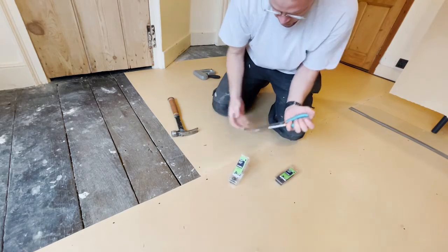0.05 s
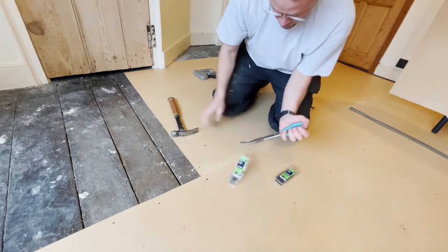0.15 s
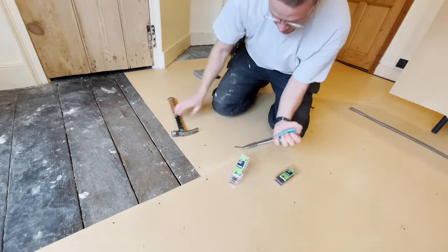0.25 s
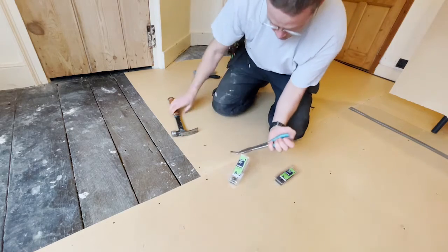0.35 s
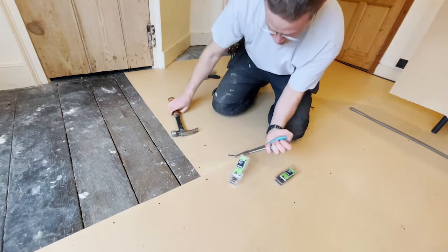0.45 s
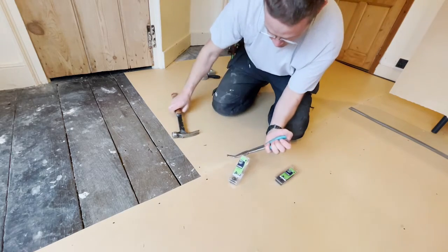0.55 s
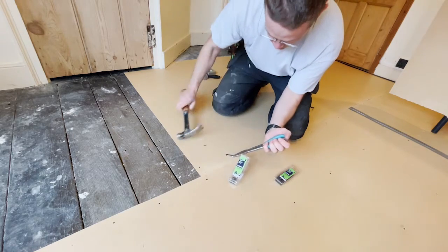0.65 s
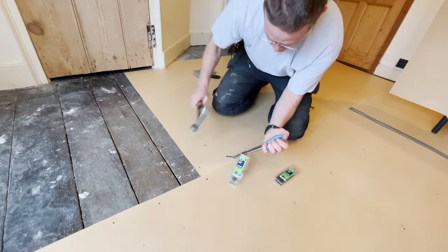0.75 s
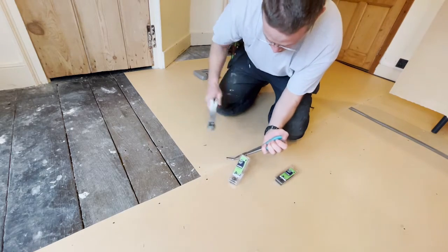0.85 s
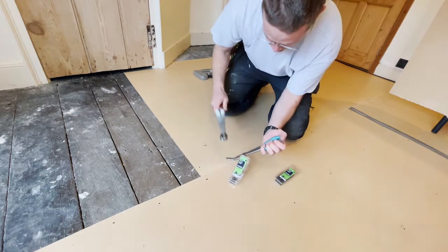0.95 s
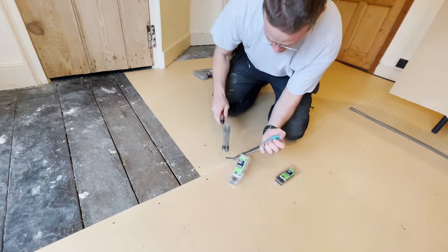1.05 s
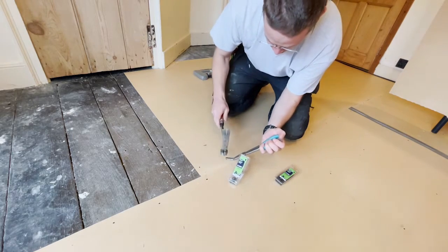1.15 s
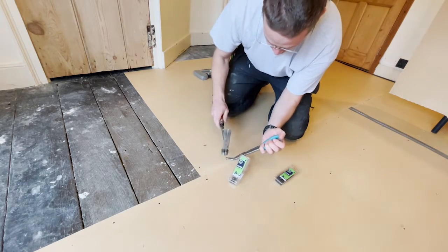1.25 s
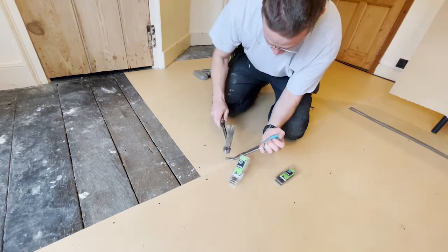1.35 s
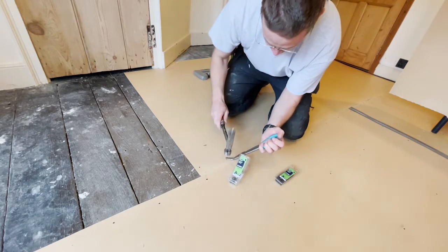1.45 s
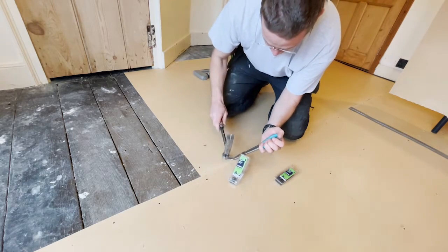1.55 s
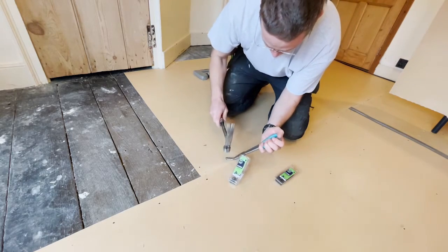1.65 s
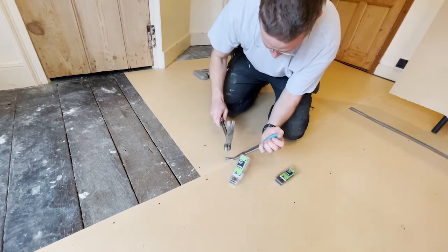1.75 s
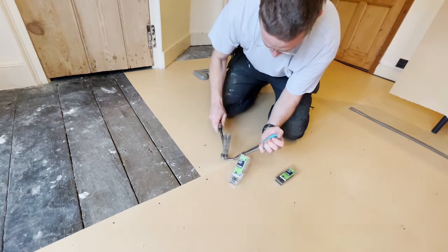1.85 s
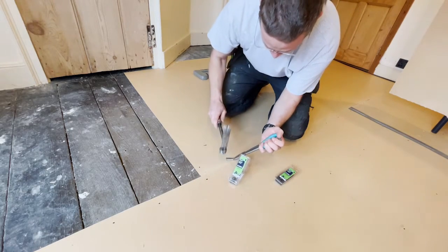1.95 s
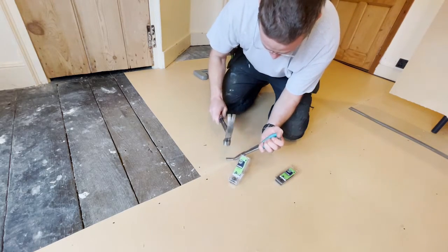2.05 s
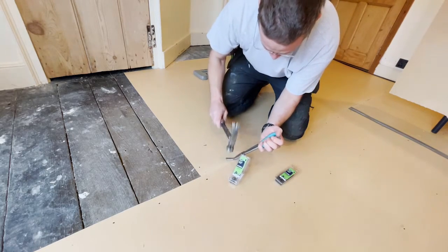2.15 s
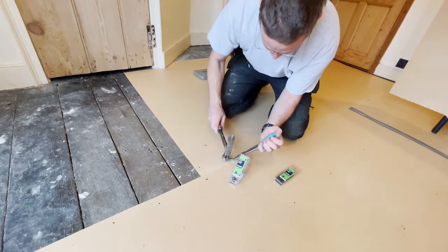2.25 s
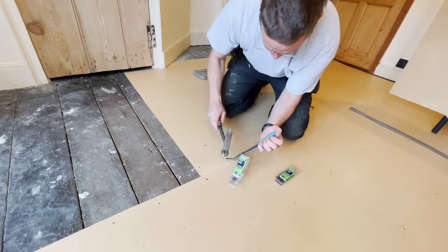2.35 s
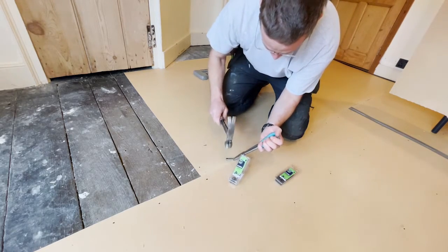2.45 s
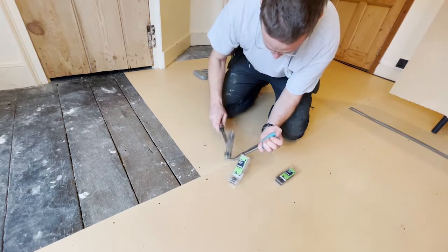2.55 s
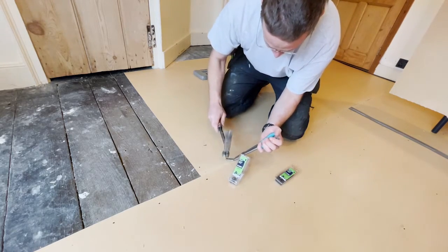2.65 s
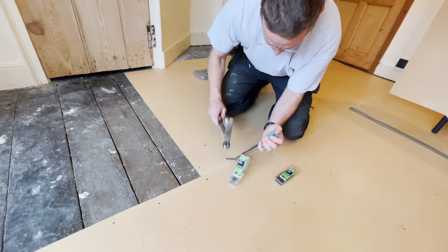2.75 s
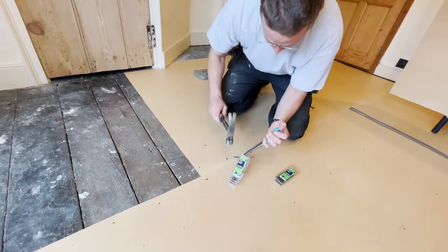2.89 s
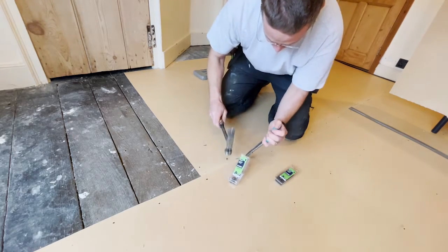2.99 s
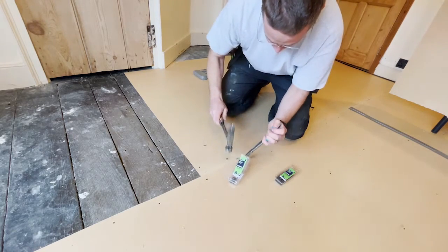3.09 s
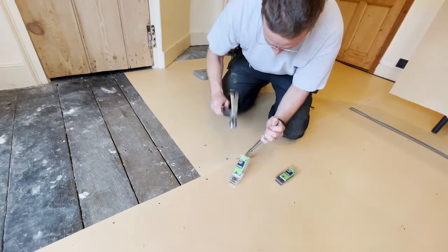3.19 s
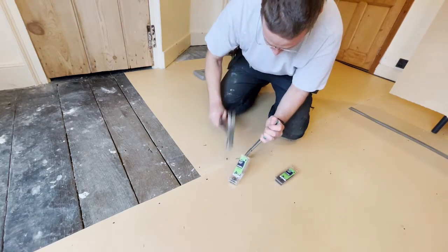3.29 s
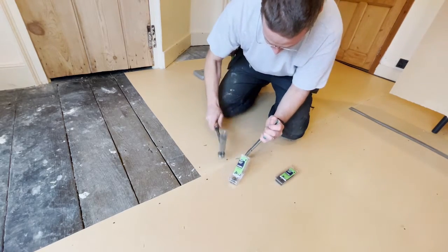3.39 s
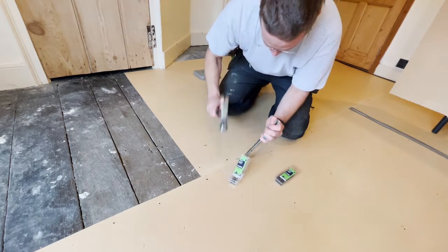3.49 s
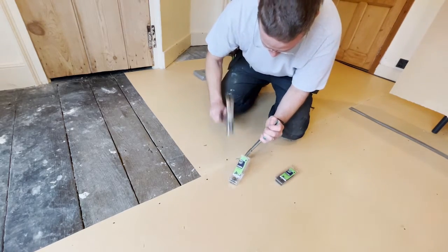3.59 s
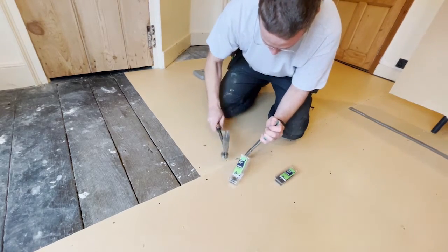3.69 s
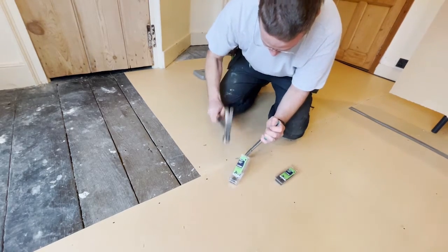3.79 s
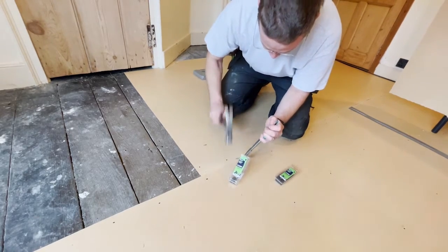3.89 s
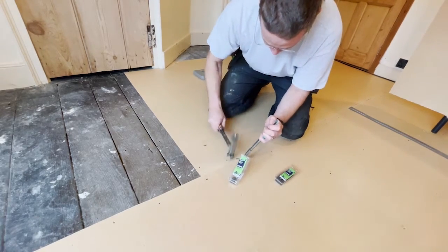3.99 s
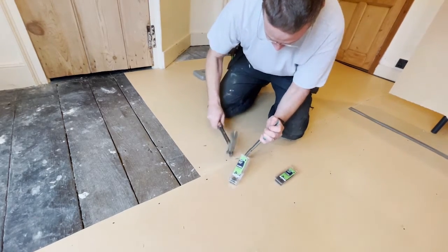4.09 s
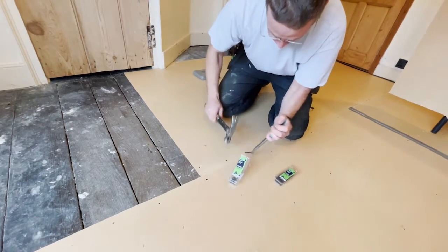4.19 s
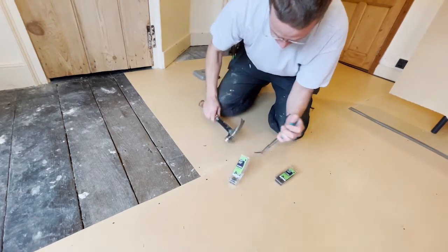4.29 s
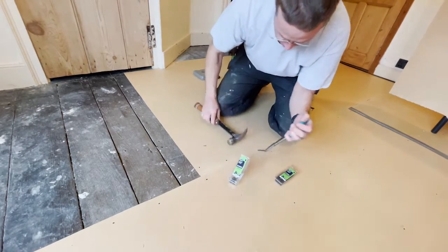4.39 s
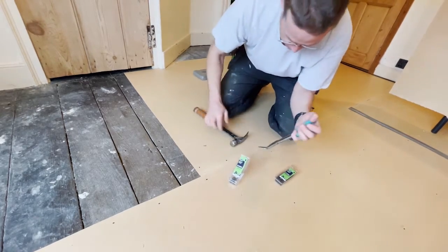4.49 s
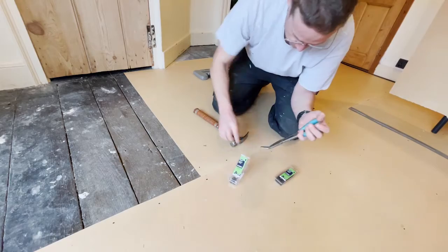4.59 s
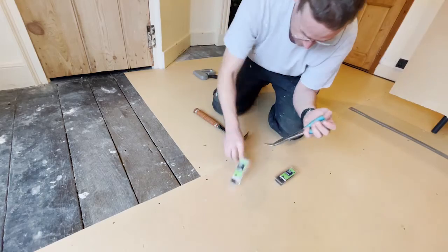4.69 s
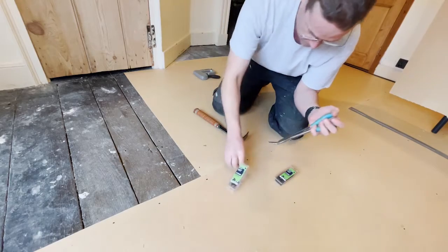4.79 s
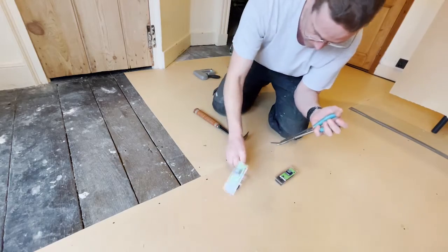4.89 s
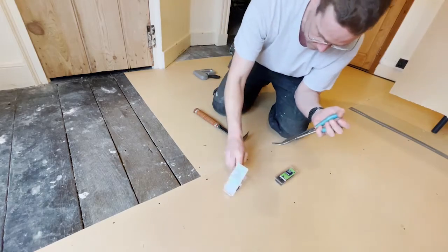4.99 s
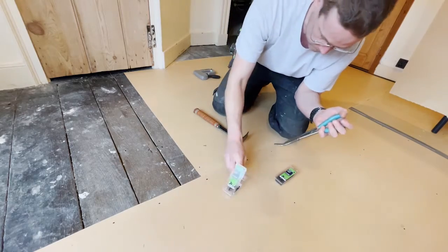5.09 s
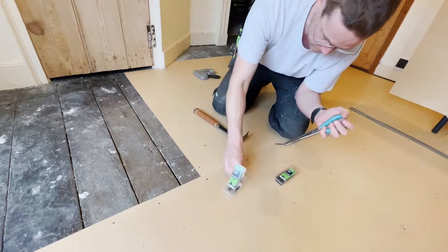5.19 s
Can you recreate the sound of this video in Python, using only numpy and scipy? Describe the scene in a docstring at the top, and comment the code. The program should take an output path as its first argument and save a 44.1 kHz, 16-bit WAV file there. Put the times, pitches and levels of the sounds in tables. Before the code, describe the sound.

Bare, reverberant room with wooden floor, close microphone. Faint cloth rustle and soft low knocks over hiss and fading rumble, then three light hammer taps, a small knock, and three increasingly hard blows, the last ones clipping. Boards ring hollow and the floor shakes deeply. The hammer is laid down with a quick bouncing clatter, and a small box of tacks is picked up with a brief rattle.

```python
"""A bare, echoing room with a boarded floor: a hammer drives a tack through hardboard, light taps, then
blows that overload the microphone. The hammer is laid down with a bounce, a small box of tacks is picked up.
Impacts are coloured contact clicks that ring floor modes, sway joists and sound in the room.
Grainy shaped noise makes clothes rustle as the hands move, then tacks rattle and slide in their box.
Behind lie faint hiss and a wavering low rumble."""
import sys
import numpy as np
from scipy import signal
from scipy.fft import rfft, irfft
from scipy.io import wavfile
from scipy.ndimage import uniform_filter1d

SR = 44100
rng = np.random.default_rng(int(sys.argv[2]) if len(sys.argv) > 2 else 0)


def decibels_to_gain(level_db):
    """Convert a level in decibels to a linear amplitude gain (20 dB per decade)."""
    exponent = np.asarray(level_db, float) / 20
    return 10 ** exponent


def bounce(signal):
    """Save signal as a 16-bit WAV file at the path given by the first command-line argument."""
    frames = np.transpose(np.atleast_2d(signal))
    limited = np.clip(frames, -1, 1)
    pcm = np.round(limited * 32767).astype(np.int16)
    wavfile.write(sys.argv[1], SR, pcm)


N = 231001


def evened(x):
    """Scales to rms 1."""
    return x / np.sqrt(np.mean(x ** 2) + 1e-20)


def read(points, hz):
    """Reads a table on a log-frequency axis."""
    f, value = np.transpose(points)
    return np.interp(np.log(hz + 1), np.log(f + 1), value)


def add(mix, start_s, sound):
    """Mixes a sound in at start_s."""
    part = mix[round(start_s * SR):][:len(sound)]
    part += sound[:len(part)]


def coloured(db_of_hz):
    """Steady noise of rms 1 with the given spectrum."""
    hz = np.fft.rfftfreq(N, 1 / SR)
    spectrum = rfft(rng.standard_normal(N)) * decibels_to_gain(db_of_hz(hz))
    return evened(irfft(spectrum, N))


# decay of the tail per band: [freq_hz, t60_s]
ROOM_DECAY = [(60, 0.49), (160, 0.32), (270, 0.54), (340, 0.66), (600, 0.82), (1100, 0.86), (2900, 0.84),
              (7700, 0.64), (12000, 0.39), (16000, 0.38)]
# direct path and nearby walls: [delay_s, energy_db]
ECHOES = [(0, -0.5), (.0021, 0), (.0038, -5), (.0055, -6.5), (.0077, -2), (0.013, -8), (0.021, -18.5),
          (.030, -7.5)]


def room():
    """Early arrivals scattered over a millisecond, then a dense tail whose bands die at their own speeds."""
    tail_energy_db = 3  # against a 0 dB echo
    thicken_s, scatter_s, bass_cut_hz = 0.007, 0.0012, 200
    t = np.arange(SR) / SR
    hz, frame_s, z = signal.stft(rng.standard_normal(SR), SR, nperseg=512)
    decay_db = -60 * frame_s / read(ROOM_DECAY, hz)[:, None]
    tail = signal.istft(z * decibels_to_gain(decay_db), SR, nperseg=512)[1][:SR]
    tail *= 1 - np.exp(-(t / thicken_s) ** 2)
    out = decibels_to_gain(tail_energy_db) * tail / np.linalg.norm(tail)
    bass_pole = np.exp(-2 * np.pi * bass_cut_hz / SR)
    for delay_s, energy_db in ECHOES:
        scatter = rng.standard_normal(400) * np.exp(-t[:400] / scatter_s)
        scatter[0] += 3
        scatter = signal.lfilter([1, -1], [1, -bass_pole], scatter)  # the bass needs time to build
        add(out, delay_s, decibels_to_gain(energy_db) * scatter / np.linalg.norm(scatter))
    return out / np.sqrt(np.mean(out[:SR // 100] ** 2))  # rms 1 over the first 10 ms


# cloth and hands moving, then tacks rattling and sliding in their box:
# [start_s, swell_s, hold_s, level_db, brightness_db]
RUSTLES = [(-0.03, .02, 0.042, -63.5, -5.5), (0.02, 0.07, .2, -76.5, -12.5),
           (0.3, 0.092, 0.18, -64.5, -4.5), (0.716, 0.18, 0.19, -77.5, -7.5), (2.929, .04, .12, -70.5, 1.5),
           (4.669, 0.0053, .02, -39, -0.5), (4.701, 0.049, 0.0095, -38, 7),
           (4.92, 0.017, 0.014, -42.5, 6.5), (4.957, 0.016, 0.092, -67.5, -11.5)]
# spectrum of the rustle: [freq_hz, density_db (per Hz)]
CLOTH = [(59, -43), (100, -12.5), (140, -13), (206, -5), (1010, -16.5), (1420, -10.5), (8280, -30.5),
         (10700, -38), (13800, -38), (16000, -46)]
# slight dip in the rustle near 1.5 kHz: [freq_hz, width_hz, gain_db]
DIP = [(1530, 220, -2.5), (2950, 220, 0)]


def rustle():
    """Grainy friction noise, dying away in step with its swell, blurred by the room."""
    grain_db, fade_db_per_swell = 2.0, 11
    t, out = np.arange(N) / SR, np.zeros(N)
    grain = decibels_to_gain(grain_db * evened(uniform_filter1d(rng.standard_normal(N), size=600)))

    def dull_db(hz):
        dip_db = sum(gain_db * np.exp(-((hz - f) / w) ** 2) for f, w, gain_db in DIP)
        return read(CLOTH, hz) + dip_db

    def bright_db(hz):
        return dull_db(hz) + read([(300, -13), (1500, 4), (6000, 9.5), (11000, 10), (16000, -17)], hz)

    dull = coloured(dull_db)
    bright = coloured(bright_db)
    for start_s, swell_s, hold_s, level_db, brightness_db in RUSTLES:
        fading_s = np.maximum(t - start_s - swell_s - hold_s, 0)
        fade_db = fade_db_per_swell * fading_s / swell_s
        level = np.clip((t - start_s) / swell_s, 0, 1) * decibels_to_gain(level_db - fade_db)
        out += level * grain * (dull / decibels_to_gain(brightness_db) + bright * decibels_to_gain(brightness_db))
    blur = room()
    return signal.fftconvolve(out, blur / np.linalg.norm(blur))[:N]


# quiet room and microphone hiss: [freq_hz, density_db (per Hz)]
AIR = [(35, -33), (60, -3), (91, 1), (113, -15), (315, -22), (398, -18), (715, -27), (2770, -30),
       (3850, -20), (4750, -30), (10500, -28), (14200, -36), (16000, -28)]


def background():
    """Faint steady hiss, and a low rumble that settles and wavers in level."""
    air_db, rumble_start_db, rumble_rest_db = -77, -50.5, -70.5
    settle_s, waver_db, waver_s = 0.79, 3, 0.062
    t = np.arange(N) / SR
    waver_poles = [np.exp(-1 / (waver_s * SR))] * 2
    waver = evened(signal.lfilter([1], np.poly(waver_poles), rng.standard_normal(N)))
    settling_db = (rumble_start_db - rumble_rest_db) * np.exp(-t / settle_s)
    rumble_db = rumble_rest_db + settling_db + waver_db * waver
    rumble = coloured(lambda hz: read([(12, -28), (26, -10.5), (40, -33), (70, -36), (200, -64)], hz))
    hiss = coloured(lambda hz: read(AIR, hz))
    return decibels_to_gain(air_db) * hiss + decibels_to_gain(rumble_db) * rumble


def causal(db):
    """Shortest causal click (minimum phase) with the given spectrum in dB."""
    log_gain = np.log(decibels_to_gain(np.concatenate([db, db[-2:0:-1]])))
    spectrum = np.exp(np.conj(signal.hilbert(log_gain)))
    return np.fft.ifft(spectrum).real[:len(db)]


# thud, body, slap, crack and tick of a contact: [freq_hz]
COLOUR_HZ = [140, 500, 1500, 3800, 10000]
# shape of the contact click: [freq_hz, gain_db]
CONTACT = [(40, -43), (90, 3), (250, 4), (330, 4.5), (550, 1.5), (800, 3.5), (2300, 0.5), (6000, -3),
           (8000, -2.5), (11000, -9), (14000, -6), (16500, -26)]


def hit(level_db, thud_db, slap_db, crack_db, tick_db):
    """Contact click, coloured by how the blow lands; colours in dB against the body."""
    hz = np.fft.rfftfreq(4096, 1 / SR)
    colour = list(zip(COLOUR_HZ, [thud_db, 0, slap_db, crack_db, tick_db]))
    click = causal(read(colour, hz) + read(CONTACT, hz))
    return decibels_to_gain(level_db) * click / np.linalg.norm(click)


# sheet and floorboards ringing on: [freq_hz, relative_db, t60_s]
BOARD_MODES = [(115.3, -12, 0.43), (188, -15, 0.31), (254.3, -12, 0.35), (330, 1, 0.5), (361, 0, 0.7),
               (383, -5, 0.7), (457, -8, .7), (476, -9, 0.49), (645, -13, 0.7), (721, -9, .5),
               (870, -17, 0.44), (926, -18, .6), (1050, -20, .6), (1187, -20, .5)]


def boards(ring_db):
    """Decaying modes of the floor, each struck a little differently from blow to blow."""
    build_s, spread_db, detune = 0.0021, 3, 0.01
    t = np.arange(SR) / SR
    ring = np.zeros(SR)
    for freq_hz, relative_db, t60_s in BOARD_MODES:
        level_db = relative_db + spread_db * rng.standard_normal()
        pitch_hz = freq_hz * (1 + detune * rng.standard_normal())
        ring += decibels_to_gain(level_db - 60 * t / t60_s) * np.sin(2 * np.pi * pitch_hz * t)
    return decibels_to_gain(ring_db) * ring * (1 - np.exp(-t / build_s))


# the whole floor sways: [freq_hz, relative_db, t60_s]
JOIST_MODES = [(27.73, -4.5, 0.99), (32.8, 3.5, 0.53), (57.2, -2, 0.52)]


def joists(level_db):
    """Very low sway that takes a few cycles to build up."""
    t = np.arange(SR) / SR
    build = 1 - np.exp(-t / 0.055)
    sway = np.zeros(SR)
    for freq_hz, relative_db, t60_s in JOIST_MODES:
        wave = np.sin(2 * np.pi * (freq_hz * t + rng.random()))
        sway += decibels_to_gain(relative_db - 60 * t / t60_s) * wave
    return decibels_to_gain(level_db) * build * sway


def impacts(rows, ring_db, shake_db):
    """Each impact rings the boards, sounds in the room and shakes the joists, up to a limit."""
    out = np.zeros(N)
    for start_s, level_db, *colour_db in rows:
        click = hit(level_db, *colour_db)
        add(out, start_s, signal.fftconvolve(click, room() + boards(ring_db)))
        add(out, start_s, joists(min(level_db, -5) + shake_db))
    return out


# tools touching, leaving and bouncing on the floor: [start_s, level_db, thud_db, crack_db]
KNOCKS = [(0.416, -47.5, 18.5, -8), (0.548, -58.5, 10, -10), (0.953, -50.5, 13.5, -28),
          (2.9247, -29.5, 11, -15.5), (4.334, -18.5, 12.5, -16.5), (4.418, -10, 7, -14.5),
          (4.4242, -11.5, 11.5, -15), (4.452, -22.5, 6, -7), (4.53, -28.5, 5, -7.5)]


def knocks():
    """Contacts with the floor; slap and tick fall by shares of the crack's fall."""
    slap_share, tick_share = 0.27, 1.65
    rows = [(start_s, level_db, thud_db, slap_share * crack_db, crack_db, tick_share * crack_db)
            for start_s, level_db, thud_db, crack_db in KNOCKS]
    return impacts(rows, ring_db=-34.5, shake_db=-17.0)


# hammer on tack, level as rms over the first 10 ms: [start_s, level_db, slap_db, crack_db, tick_db]
BLOWS = [(1.8244, -20.5, -10.5, -17, -23), (2.2056, -14, -7, -14.5, -20.5),
         (2.571, -11.5, -10.5, -20.5, -26.5), (3.312, -7, -10.5, -16, -18.5), (3.6285, 1, -9, -24, -22),
         (3.918, 8, -3, -19, -24.5)]


def hammering():
    """Blows on the tack: slap of the sheet, crack and steel tick over a low thud."""
    thud_db = -2
    rows = [(start_s, level_db, thud_db, *upper_db) for start_s, level_db, *upper_db in BLOWS]
    return impacts(rows, ring_db=-31, shake_db=-9.5)


# box of tacks gripped and lifted: [start_s, level_db, crack_db]
BOX_CLICKS = [(4.674, -41, -4), (4.732, -40, 8), (4.763, -39, 19), (4.906, -30, -1), (4.913, -45.5, 15),
              (4.951, -41, 22)]


def tack_box():
    """Clicks of the light box; the tick keeps a fixed distance from the crack."""
    thud_db, slap_db, tick_over_crack_db = -2, 3, -5.5
    rows = [(start_s, level_db, thud_db, slap_db, crack_db, crack_db + tick_over_crack_db)
            for start_s, level_db, crack_db in BOX_CLICKS]
    return impacts(rows, ring_db=-34, shake_db=-28)


def scene():
    """All sources at one microphone."""
    mix = rustle() + background() + knocks() + hammering() + tack_box()
    return mix[None]


def low_pass(x):
    """Removes everything above the highest recorded frequency."""
    return signal.sosfilt(signal.butter(12, 16930, fs=SR, output="sos"), x)


def record(dry):
    """The loudest blows hit the ceiling of the input."""
    mix = np.clip(dry, -1, 1)
    return low_pass(mix)


dry = scene()
out = record(dry)
bounce(out)
```